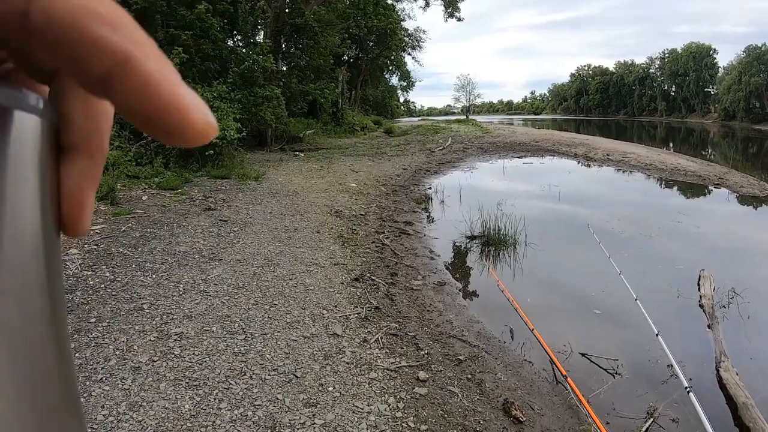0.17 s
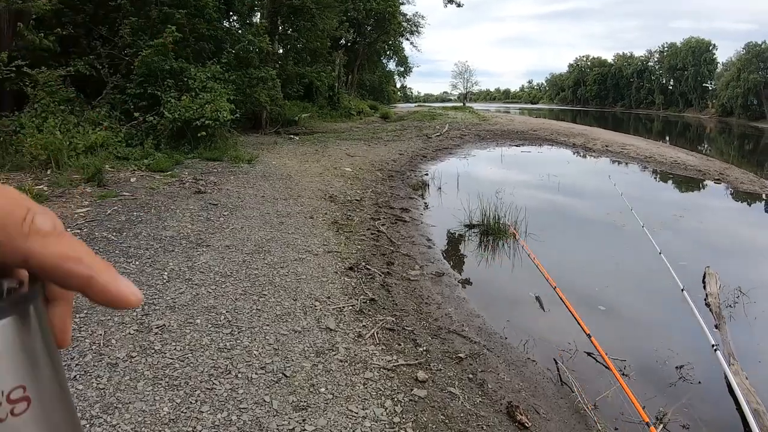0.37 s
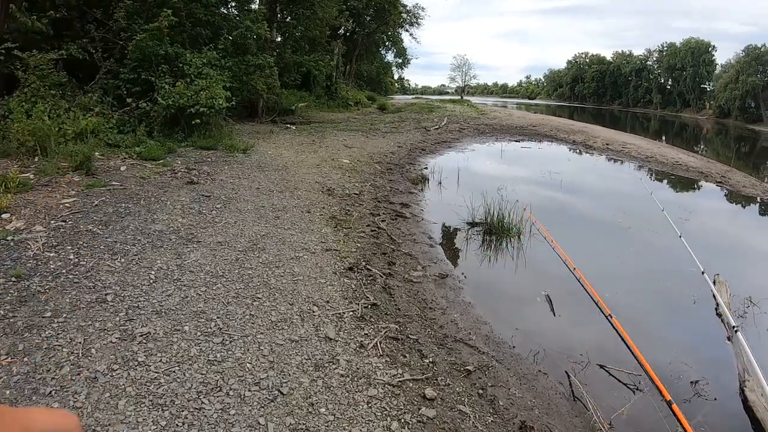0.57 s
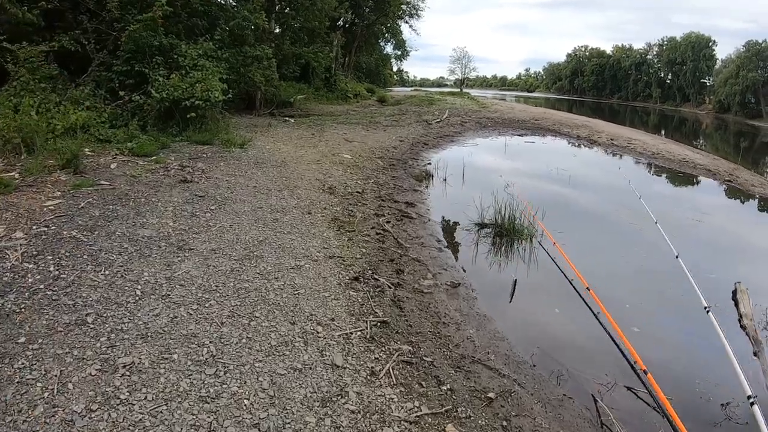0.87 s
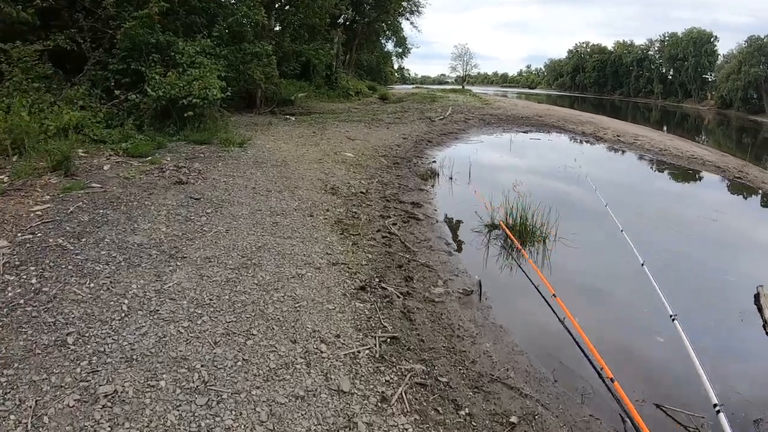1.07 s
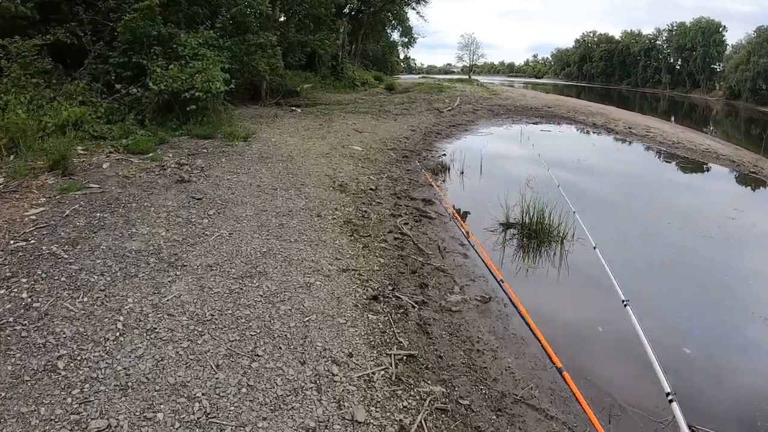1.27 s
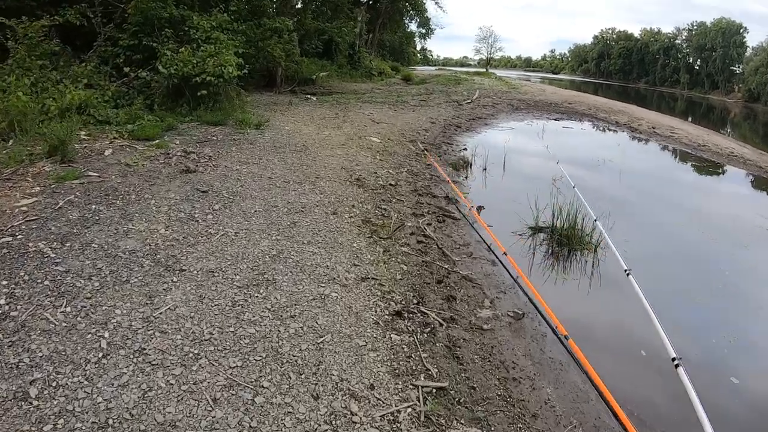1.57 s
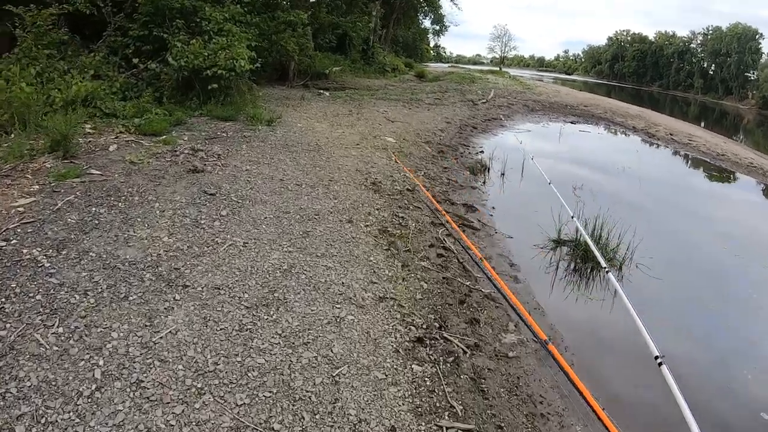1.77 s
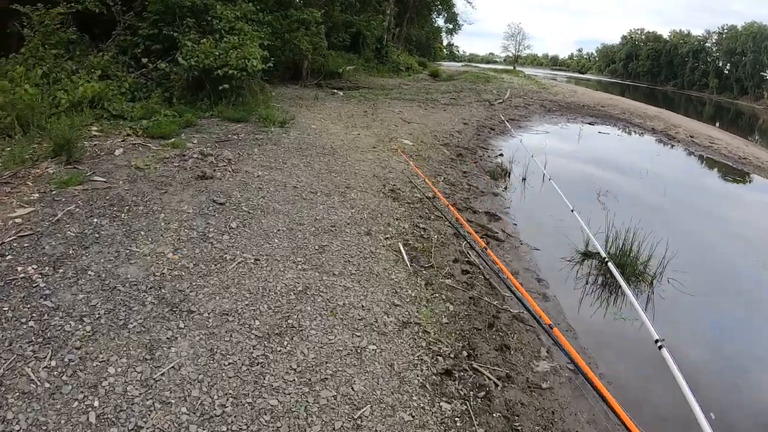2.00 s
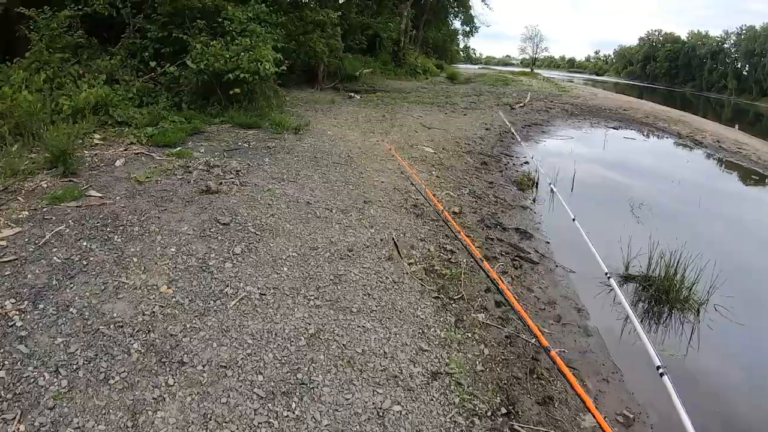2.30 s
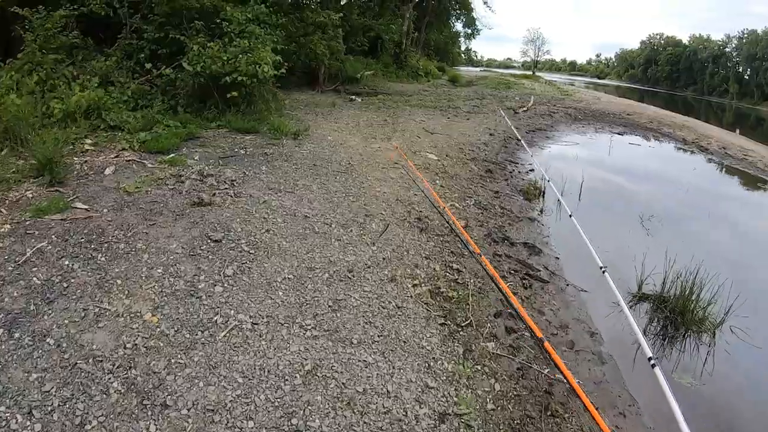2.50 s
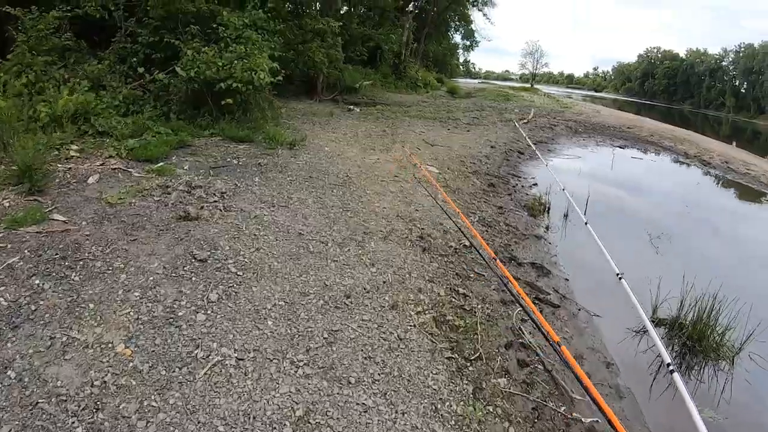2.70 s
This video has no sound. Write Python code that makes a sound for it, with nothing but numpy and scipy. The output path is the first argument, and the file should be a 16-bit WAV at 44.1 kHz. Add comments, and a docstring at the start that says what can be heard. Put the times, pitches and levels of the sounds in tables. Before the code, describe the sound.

Slow footsteps crunch on gravel and shell close by, starting around 0.4 seconds after a brief silence. Pebbles knock and soles scuff through to about 2.8 seconds, with low heel thuds near 1.2 seconds. Gear squeaks faintly around 0.5 seconds, and a small bird chips very faintly early on. Low wind rumbles throughout, while a distant engine hum swells from 1.5 seconds, sinking slightly in pitch.

```python
"""A riverbank of gravel and crushed shell, with someone walking slowly over it.
Each step grinds a bed of small grains; stones knock, shell splinters snap, soles scuff and heels thud.
The walker's gear rubs and squeaks faintly. Behind this a distant engine hums under low wind rumble
and a small bird chips. The sound fades in after a short silence."""
import sys
import numpy as np
from scipy import signal
from scipy.fft import rfft, irfft
from scipy.io import wavfile

SR = 44100
rng = np.random.default_rng(int(sys.argv[2]) if len(sys.argv) > 2 else 0)


def digitize_waveform(pressure):
    """Quantize a signal to 16-bit integers and store it at the path in sys.argv[1].

    Rows of a 2-D input are taken as channels; values are limited to [-1, 1].
    """
    field = np.atleast_2d(pressure).T
    bounded = np.clip(field, -1, 1)
    quanta = np.round(bounded * 32767).astype(np.int16)
    wavfile.write(sys.argv[1], SR, quanta)


N = 125685
TIME = np.arange(N) / SR
FREQS = np.fft.rfftfreq(N, 1 / SR)

# Crunches underfoot: start_s, length_s, attack_s, gravel_db, grit_db
CRUNCHES = [(0.417, .13, 0.013, -40, -52), (0.607, 0.066, 0.015, -44, -59.5),
            (1.043, 0.27, 0.044, -42.5, -52), (1.387, .24, 0.023, -43.5, -54),
            (1.657, .07, .02, -38, -50.5), (1.781, 0.11, 0.049, -43, -57.5),
            (2.116, 0.13, 0.024, -45.5, -59), (2.271, 0.096, 0.019, -42, -56),
            (2.444, 0.22, 0.029, -47, -53.5), (2.73, .12, .02, -38, -54.5)]
# Tone of the coarse gravel: frequency_hz, relative_db
GRAVEL_TONE = [(150, 4.5), (450, 7.5), (900, 2), (1550, 0), (2100, -14.5), (3100, -30.5), (4500, -29.5),
               (6000, -67.5)]
# Tone of the fine shell grit: frequency_hz, relative_db
GRIT_TONE = [(1000, -19), (2100, 1.5), (3100, -1.5), (4500, -5.5), (5300, -16.5), (6400, -26), (8100, -20),
             (9000, -33.5), (11000, -32), (12500, -57), (15000, -63.5)]
# Stones knocking together: time_s, pitch_hz, level_db, crack_relative_db
STONE_KNOCKS = [(.4257, 1250, -32, -4), (.4934, 2010, -21, -10), (.6692, 1330, -22.5, -20),
                (.9343, 1330, -26.5, -29), (1.0708, 860, -27, -16), (1.094, 1050, -30.5, -13),
                (1.1271, 2960, -26.5, -14), (1.143, 1110, -16, -17), (1.1744, 1530, -23, -16),
                (1.677, 3200, -28, -13), (1.7056, 870, -22, -14), (1.7096, 1600, -25.5, -8.5),
                (1.7371, 1460, -21, -14.5), (1.831, 1440, -25, -12), (2.023, 2370, -28, -10),
                (2.1431, 2430, -32.5, -12), (2.1778, 1260, -27, -11), (2.2955, 740, -19.5, -8.5),
                (2.3343, 890, -20.5, -11.5), (2.513, 1086, -18, -13), (2.7359, 1070, -28.5, -19),
                (2.754, 2800, -30, -17), (2.8004, 1050, -19.5, -20)]
# Shell splinters snapping: time_s, pitch_hz, level_db, crumbs_relative_db
SHELL_SNAPS = [(.48, 7400, -58, -11), (.533, 7500, -57, -4.5), (.823, 7700, -67, -7),
               (0.855, 7500, -63, -0.5), (.998, 7000, -63, -10), (1.095, 6500, -49, -22),
               (1.139, 7800, -51, -13), (1.1506, 6200, -46, -12.5), (1.191, 7500, -48, -20),
               (1.254, 7500, -52.5, -12), (1.508, 11500, -56.5, -15), (1.872, 8000, -57.5, -3.5),
               (1.885, 10400, -65.5, -1.5), (2.168, 8000, -68, 5.5), (2.181, 10500, -72.5, 6.5),
               (2.604, 8200, -63, -2.5)]
# Drags of the sole: start_s, length_s, scrape_db, push_db
SOLE_SCUFFS = [(0.332, 0.061, -55, -33), (0.509, 0.068, -38.5, -37.5), (1.868, 0.029, -34, -30),
               (1.91, 0.095, -40, -31), (2.061, 0.04, -35.5, -29), (2.114, 0.06, -40, -29.5)]
# Heel landings: time_s, level_db
HEEL_THUDS = [(1.149, -12), (1.3, -15), (2.641, -26)]
# Gear rubbing: start_s, length_s, from_hz, to_hz, level_db
GEAR_SQUEAKS = [(.18, .09, 2620, 2650, -61), (.26, .15, 2650, 2720, -54.5), (.44, .12, 2700, 2730, -56),
                (.422, .045, 3100, 3290, -51), (.46, .105, 3270, 3410, -51), (.415, .065, 1470, 1450, -44),
                (.47, .08, 1500, 1610, -45), (.54, .12, 1620, 1590, -51), (.42, .14, 5380, 5420, -70),
                (2.438, .02, 2400, 2380, -51), (2.808, .025, 2340, 2310, -48)]
# The engine's hum over time: time_s, pitch_hz, level_db
ENGINE_HUM = [(.2, 116, -35), (.36, 122, -31.5), (.85, 120, -33), (1.28, 119, -28.5), (1.42, 113, -31),
              (1.55, 111, -22.3), (1.6, 110, -32), (1.68, 109.5, -23.5), (1.8, 108.7, -21),
              (1.915, 108, -21), (1.96, 108, -35), (2.0, 107.5, -25), (2.08, 107.5, -19.8),
              (2.22, 108, -18.3), (2.42, 107.3, -21.3), (2.5, 107.3, -24.5), (2.7, 107, -25),
              (2.85, 105, -29)]
# Tone of the wind rumble: frequency_hz, relative_db
WIND_TONE = [(15, -16), (30, -1), (42, -3), (60, 2), (85, 4), (135, 1), (165, -7), (200, -5.5),
             (280, -18.5), (450, -23), (1000, -78.5)]
# Strength of the wind rumble: time_s, level_db
WIND_LEVEL = [(.2, -29.5), (.5, -30), (.95, -27), (1.15, -25), (1.38, -24.5), (1.6, -28), (1.75, -26.5),
              (1.97, -28), (2.15, -24.5), (2.45, -27.5), (2.66, -25), (2.85, -27)]
# Tone of the open air: frequency_hz, relative_db
AIR_TONE = [(60, -15.5), (250, 2.5), (450, -2), (800, -4.5), (1400, -12), (2100, -20.5), (3000, -21.5),
            (4300, -29), (5200, -36), (6200, -49.5), (8000, -49.5), (9200, -76), (15000, -78.5)]
# The bird's short calls: start_s, length_s, from_hz, to_hz, level_db
BIRD_CHIPS = [(.54, .03, 6500, 5000, -69), (.77, .02, 7600, 4300, -67), (.829, .015, 5800, 6050, -68),
              (.865, .02, 6150, 4850, -66), (1.298, .022, 5700, 5050, -65)]
# The opening rise in volume: time_s, gain_db
FADE_GAIN = [(0, -75), (.115, -58), (.14, -26), (.16, -9), (.18, -1.5), (.25, 0)]


def footsteps():
    """Weight on the ground sets off clumps of grains: coarse gravel and fine shell grit."""
    gravel = colour(grains(), GRAVEL_TONE)
    grit = colour(grains(), GRIT_TONE)
    crunch = np.zeros(N)
    for start, length, attack, gravel_db, grit_db in CRUNCHES:
        pressure = envelope(start, length, attack, release_s=0.042)
        crunch += pressure * (amp(gravel_db) * gravel + amp(grit_db) * grit)
    clumps_db = 1.8 * wander(rate_hz=75)
    return crunch * amp(clumps_db)


def stone_knocks():
    """Single pebbles hit each other: a short knock with a sharp crack on top."""
    out = np.zeros(N)
    for time_s, hz, db, crack_db in STONE_KNOCKS:
        knock = contact(hz, rise_cycles=.58, fall_cycles=.68)
        crack = contact(hz=2700, rise_cycles=.65, fall_cycles=.65)
        add_centred(out, time_s, amp(db) * (knock + amp(crack_db) * crack))
    return out


def shell_snaps():
    """Bits of shell break with a tiny high click and a scatter of crumbs."""
    out = np.zeros(N)
    for time_s, hz, db, crumbs_db in SHELL_SNAPS:
        snap = contact(hz, rise_cycles=1.8, fall_cycles=1.8, scatter_db=crumbs_db, scatter_s=.009)
        add_centred(out, time_s, amp(db) * snap)
    return out


def sole_scuffs():
    """The sole drags over the grains: a dull scrape above a low push."""
    scrape = band(grains(), hz=602, octaves=0.63)
    push = band(grains(), hz=217, octaves=0.38)
    out = np.zeros(N)
    for start, length, scrape_db, push_db in SOLE_SCUFFS:
        drag = envelope(start, length, attack_s=0.0064, release_s=0.0095)
        out += drag * (amp(scrape_db) * scrape + amp(push_db) * push)
    return out


def heel_thuds(pitch_hz=60.4, width_cycles=0.27):
    """The heel lands with one low swing out and back, without ringing."""
    out = np.zeros(N)
    for time_s, db in HEEL_THUDS:
        cycles = (TIME - time_s) * pitch_hz
        swell = np.exp(-np.minimum((cycles / width_cycles) ** 2, 100))
        out += amp(db) * swell * np.sin(2 * np.pi * cycles)
    return out


def gear_squeaks():
    """Rubbing gear gives thin, sliding tones with a fuzzy edge."""
    fuzz = wander(rate_hz=65) + 1j * wander(rate_hz=65)  # shakes both loudness and pitch
    tones = sum(glide(*squeak) for squeak in GEAR_SQUEAKS)
    return ((1 + 0.48 * fuzz) * tones).real


def engine():
    """A distant exhaust hums, sinking in pitch as it swells, with a weak tone an octave up."""
    pitch_hz = curve(ENGINE_HUM) + 1.3 * wander(rate_hz=8.3)
    phase = 2 * np.pi * np.cumsum(pitch_hz) / SR
    hum = np.sin(phase) + amp(-25) * np.sin(2 * phase)
    return np.sqrt(2) * amp(curve(ENGINE_HUM, column=2)) * hum


def wind():
    """Wind makes a low rumble that rises and falls over the even wash of the open air."""
    rumble = colour(rng.standard_normal(N), WIND_TONE) * amp(curve(WIND_LEVEL))
    air = colour(rng.standard_normal(N), AIR_TONE) * amp(-40.5 + 0.35 * wander(rate_hz=41))
    return rumble + air


def bird():
    """A small bird far off whistles quick, clean chips."""
    return np.sqrt(2) * sum(glide(*chip) for chip in BIRD_CHIPS).real


def grains(per_second=6500, spread_db=3):
    """Grains touching: many tiny random clicks, a few much stronger than the rest."""
    strength = amp(spread_db * np.minimum(rng.exponential(1, N), 5))
    direction = rng.choice([-1, 1], N)
    touches = rng.random(N) < per_second / SR
    return strength * direction * touches


def contact(hz, rise_cycles, fall_cycles, scatter_db=-18, scatter_s=.006):
    """One hard hit: a ring that dies almost at once, then a scatter of loose grit."""
    t = np.arange(-SR // 20, SR // 20) / SR  # the hit is in the middle, at t = 0
    width_cycles = np.where(t < 0, rise_cycles, fall_cycles)
    ring = np.exp(-(t * hz / width_cycles) ** 2) * np.sin(2 * np.pi * hz * t)
    grit = unit(signal.fftconvolve(rng.standard_normal(len(t)), ring, "same"))
    settling = np.clip(t * hz, 0, 1) * np.exp(-abs(t) / scatter_s)
    return ring + amp(scatter_db) * grit * settling


def glide(start_s, length_s, from_hz, to_hz, db):
    """A tone that swells and fades as its pitch slides; the result's real part is the sound."""
    progress = np.clip((TIME - start_s) / length_s, 0, 1)
    swell = np.sqrt(abs(np.sin(np.pi * progress)))
    pitch_hz = from_hz + (to_hz - from_hz) * progress
    return amp(db) * swell * np.exp(2j * np.pi * np.cumsum(pitch_hz) / SR)


def envelope(start_s, length_s, attack_s, release_s):
    """A loudness shape that rises, holds, then dies away."""
    t = TIME - start_s
    return np.clip(t / attack_s, 0, 1) * np.exp(-np.maximum(t - length_s, 0) / release_s)


def colour(x, tone):
    """Shapes the lows and highs of x with a tone table, at strength 1."""
    hz, db = np.transpose(tone)
    gain = amp(np.interp(np.log(FREQS + 1), np.log(hz), db))
    return unit(irfft(rfft(x) * gain, N))


def band(x, hz, octaves):
    """Keeps a broad range of pitches around hz, at strength 1."""
    octaves_away = np.log2((FREQS + 1) / hz)
    return unit(irfft(rfft(x) * np.exp(-.5 * (octaves_away / octaves) ** 2), N))


def wander(rate_hz):
    """A smooth random wobble, mostly slower than rate_hz, at strength 1."""
    return unit(irfft(rfft(rng.standard_normal(N)) * np.exp(-(FREQS / rate_hz) ** 2), N))


def curve(rows, column=1):
    """Joins the points in one column of a time table with straight lines."""
    rows = np.array(rows)
    return np.interp(TIME, rows[:, 0], rows[:, column])


def add_centred(mix, time_s, sound):
    """Mixes in a sound with its middle at time_s."""
    first = max(round(time_s * SR - len(sound) / 2), 0)
    part = mix[first:first + len(sound)]
    part += sound[:len(part)]


def amp(db):
    """Turns decibels into a number to multiply by."""
    return 10 ** (np.asarray(db) / 20)


def unit(x):
    """Scales x to an average strength (root mean square) of 1."""
    return x / np.sqrt(np.mean(x ** 2) + 1e-20)


def scene():
    """Everything on the riverbank, in one channel."""
    background = engine() + wind() + bird()
    walker = footsteps() + sole_scuffs() + heel_thuds() + stone_knocks() + shell_snaps() + gear_squeaks()
    return (walker + background)[None]


def record(dry, split_hz=500, treble_start_s=0.043, treble_rise_s=0.3, top_hz=15000):
    """Fades the sound in, the treble a little after the bass, and cuts the very highest pitches."""
    bass = irfft(rfft(dry) / (1 + (FREQS / split_hz) ** 2), N)
    treble = (dry - bass) * np.clip((TIME - treble_start_s) / treble_rise_s, 0, 1)
    faded = (bass + treble) * amp(curve(FADE_GAIN))
    high_cut = signal.firwin(511, top_hz, window=("kaiser", 9), fs=SR)
    return signal.oaconvolve(faded, high_cut[None], "same")


dry = scene()
out = record(dry)
digitize_waveform(out)
```